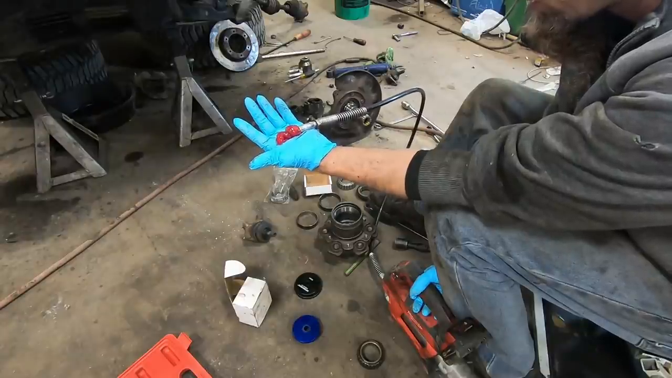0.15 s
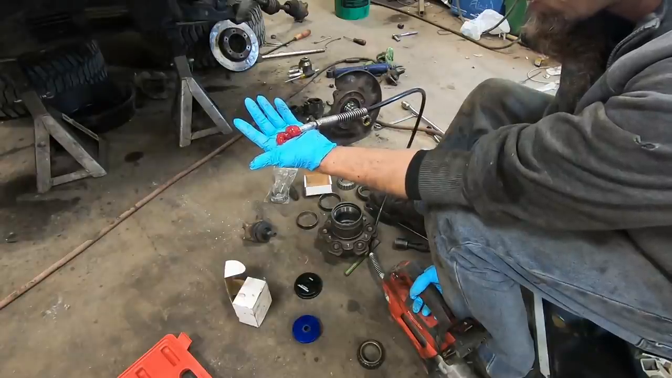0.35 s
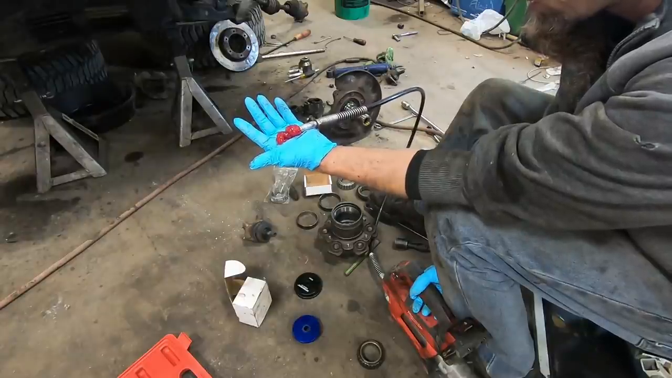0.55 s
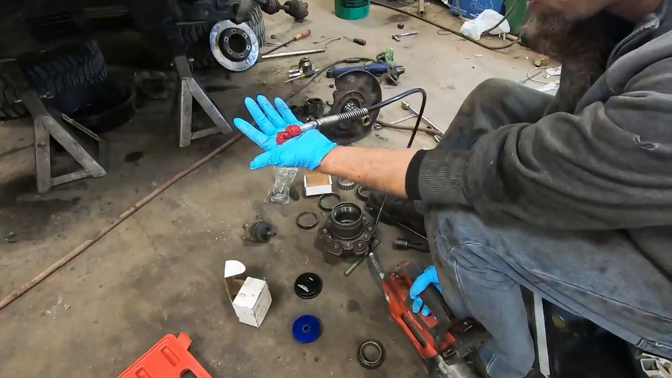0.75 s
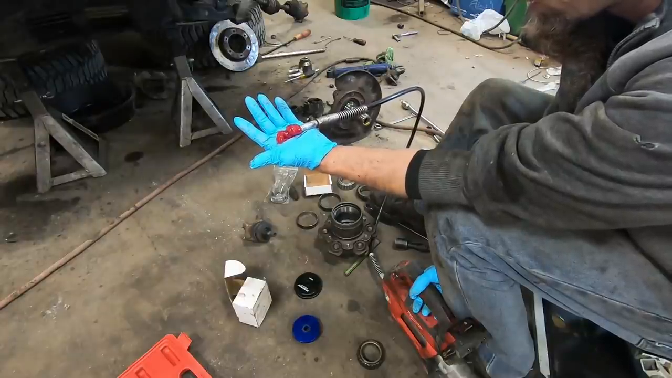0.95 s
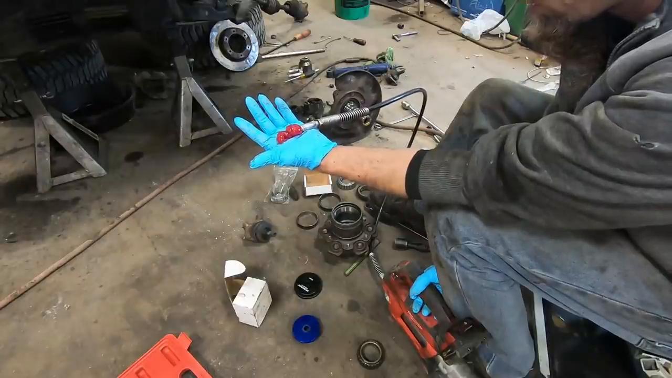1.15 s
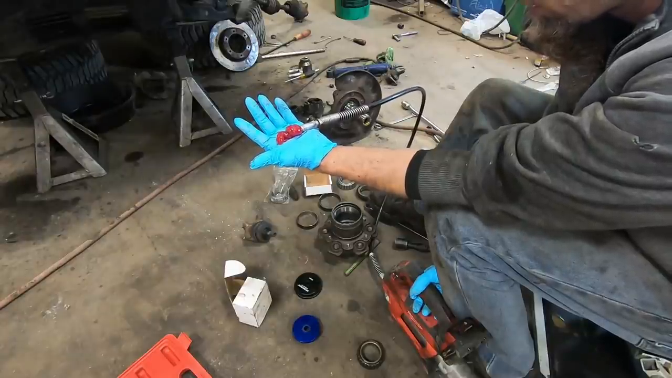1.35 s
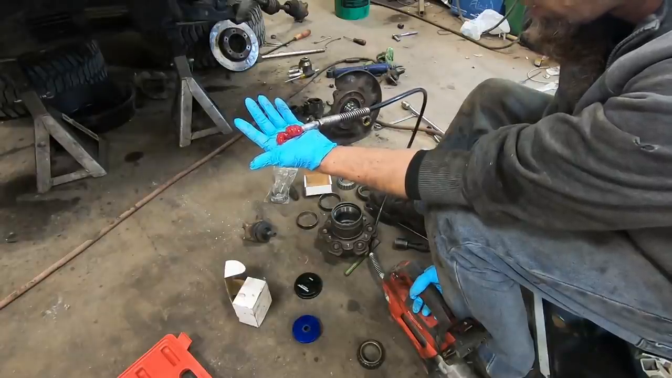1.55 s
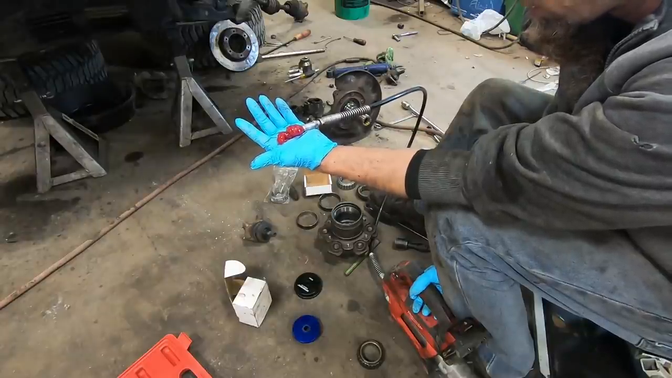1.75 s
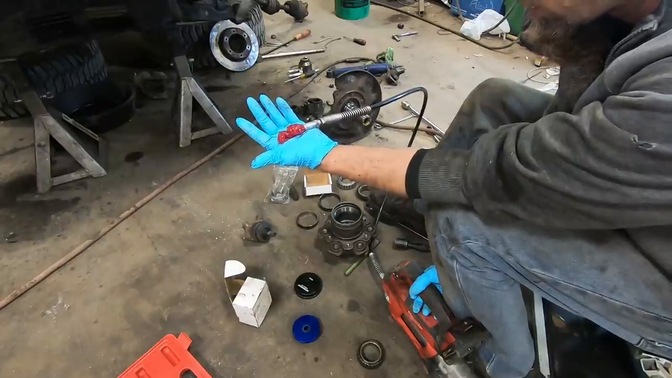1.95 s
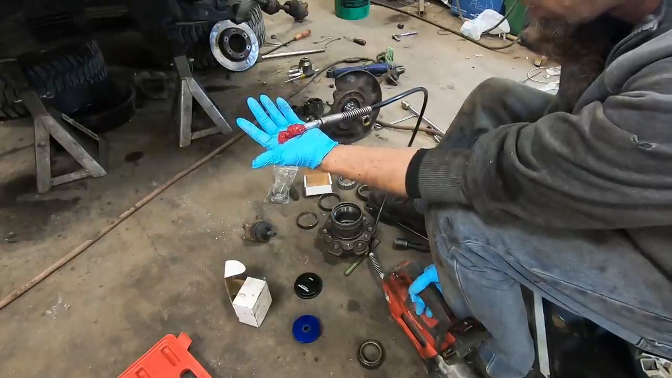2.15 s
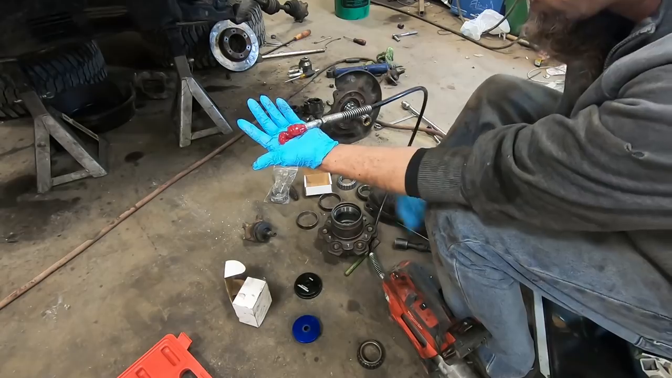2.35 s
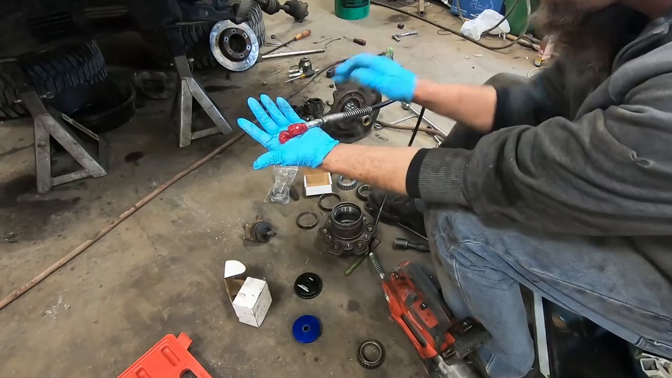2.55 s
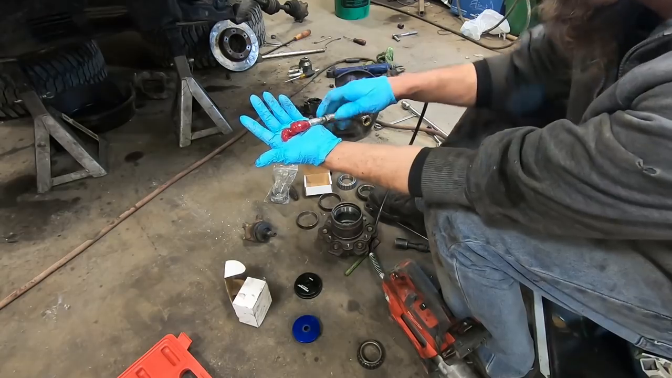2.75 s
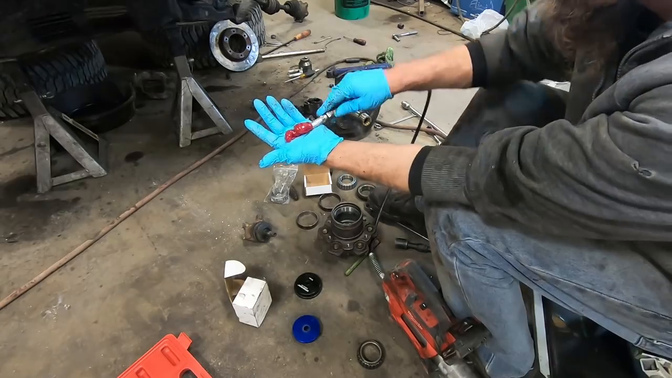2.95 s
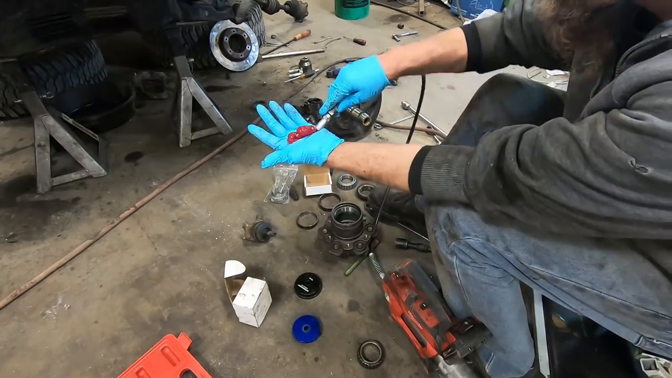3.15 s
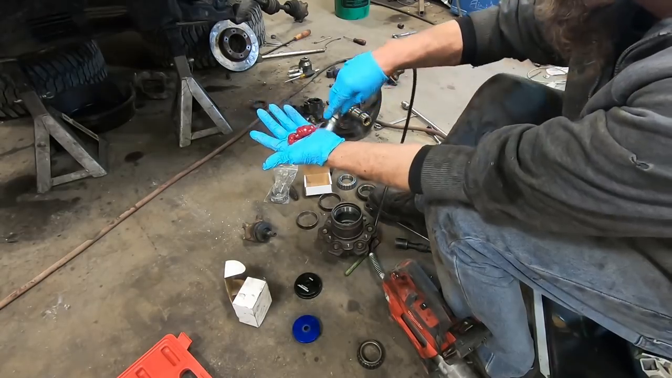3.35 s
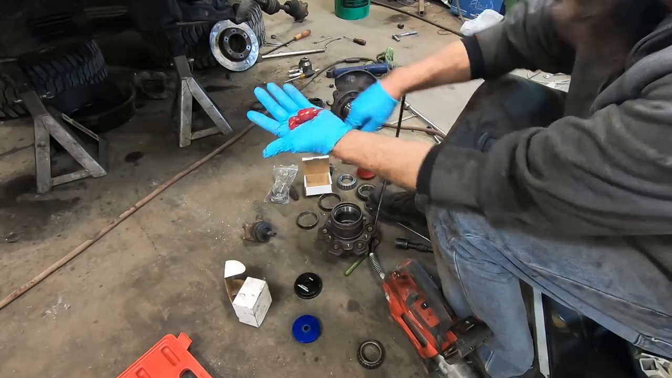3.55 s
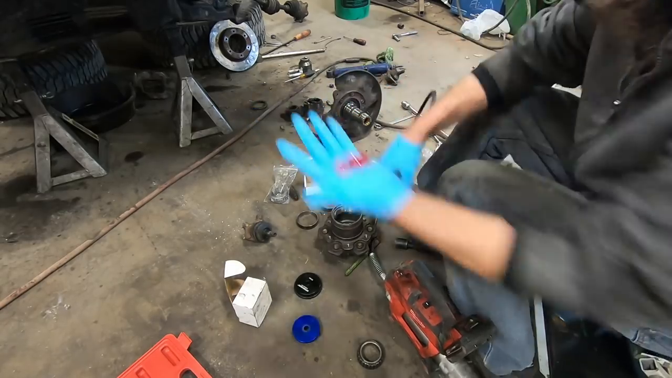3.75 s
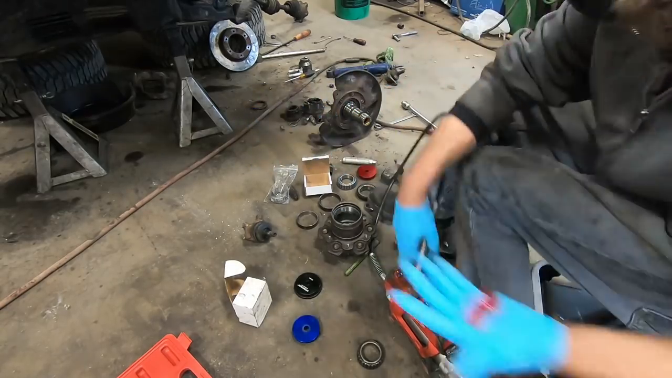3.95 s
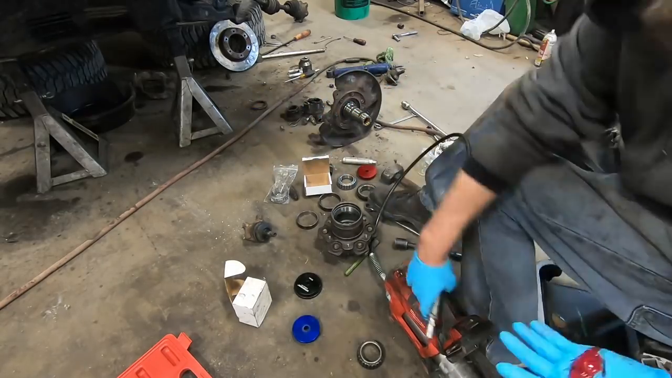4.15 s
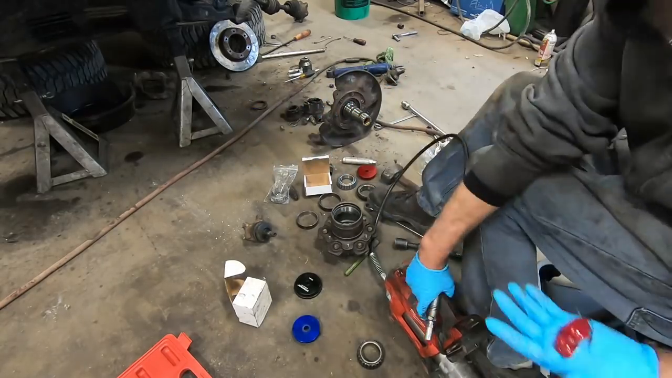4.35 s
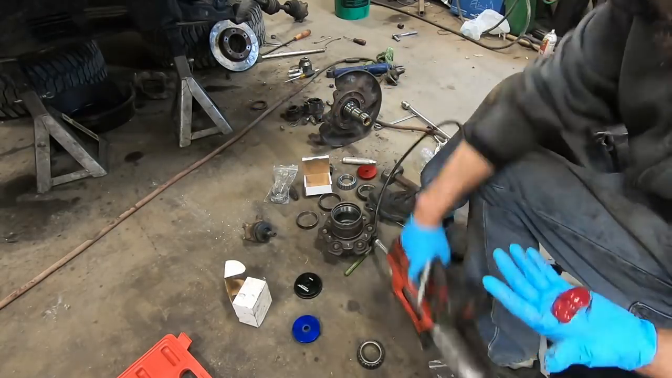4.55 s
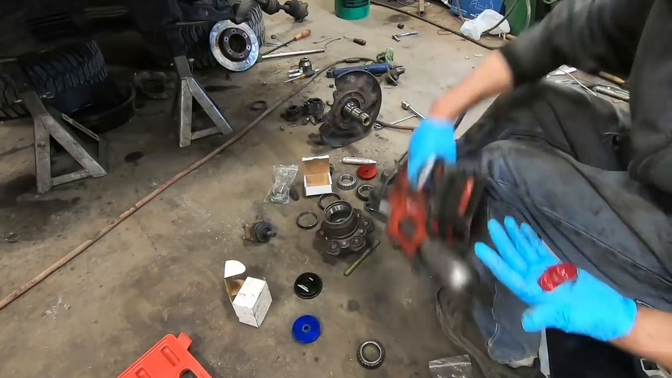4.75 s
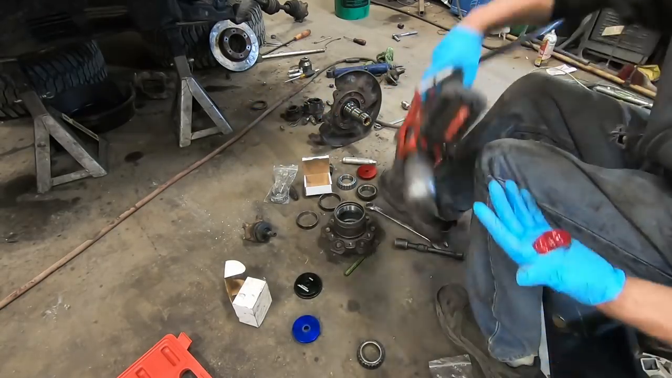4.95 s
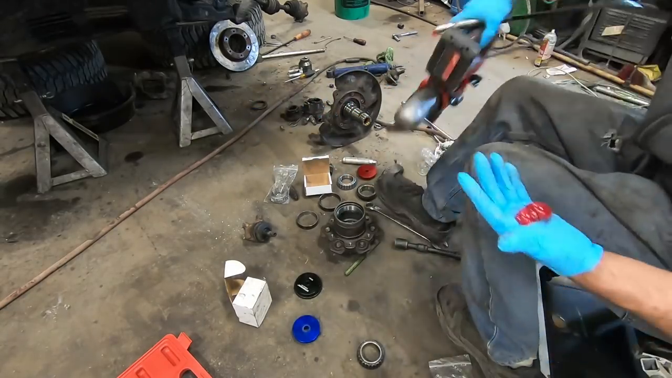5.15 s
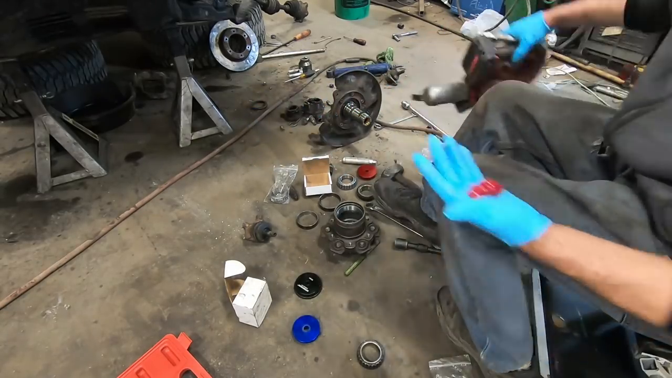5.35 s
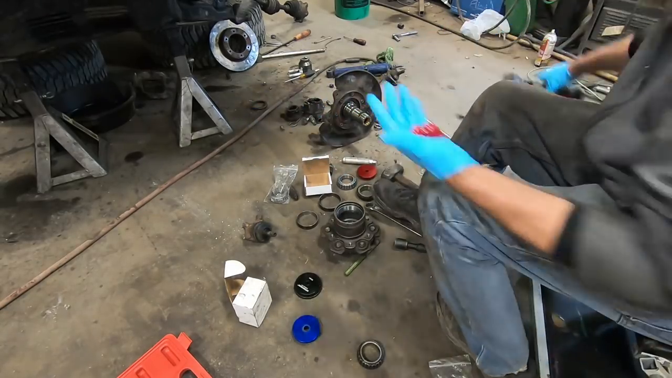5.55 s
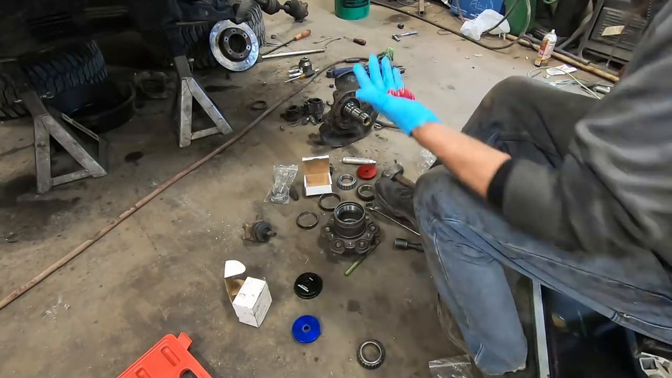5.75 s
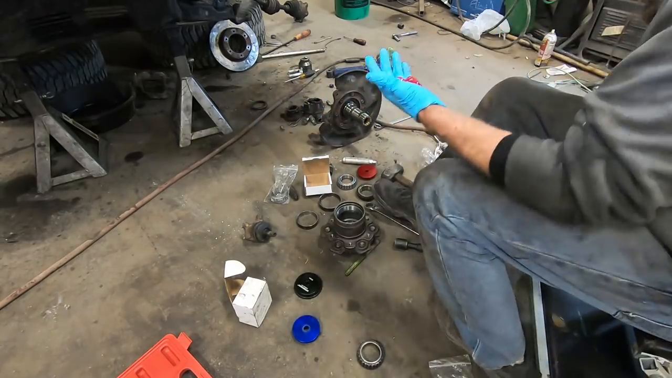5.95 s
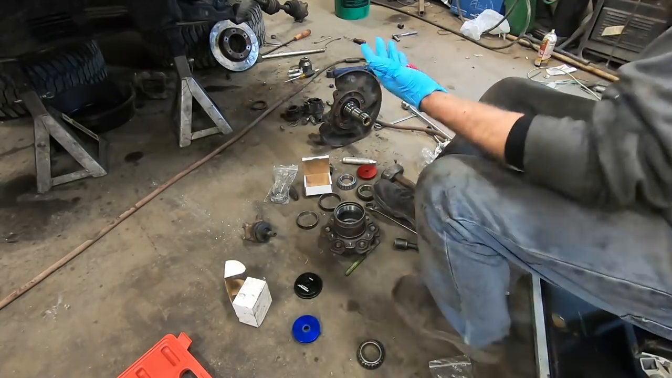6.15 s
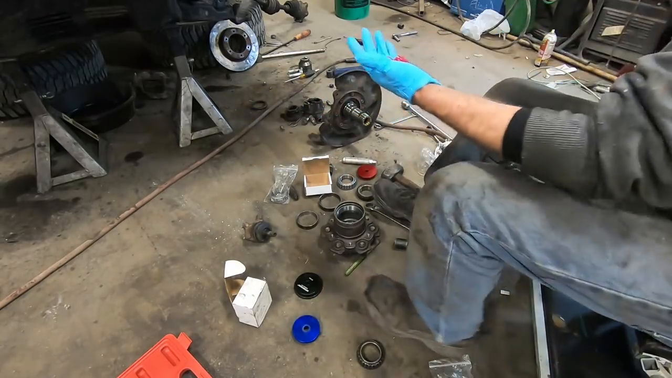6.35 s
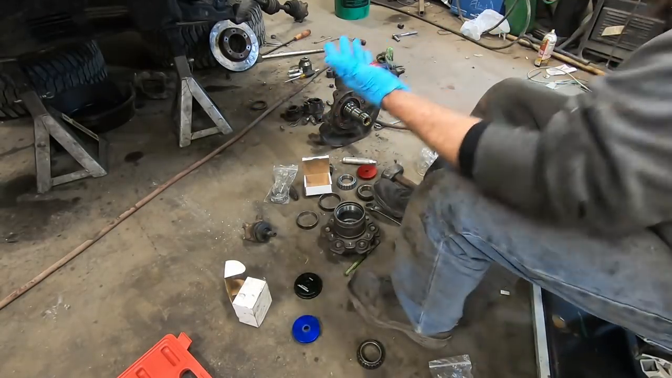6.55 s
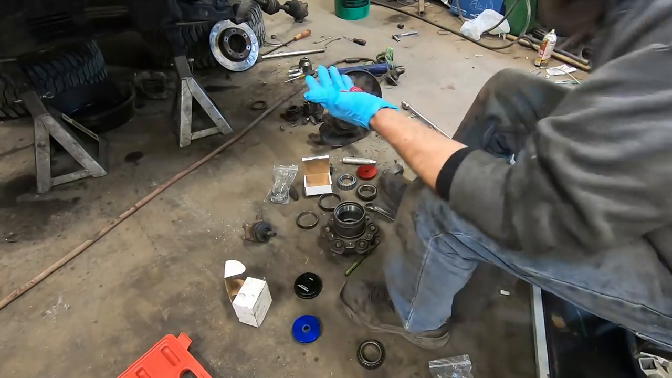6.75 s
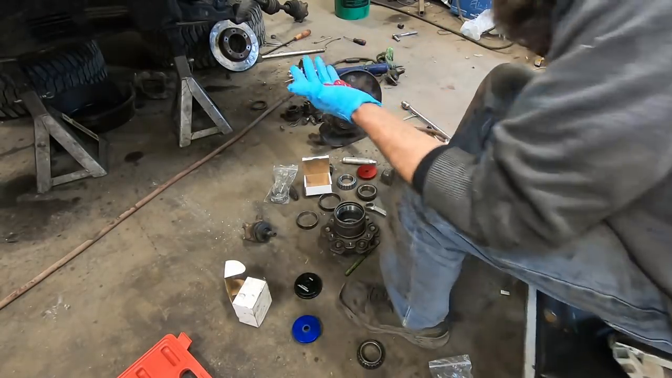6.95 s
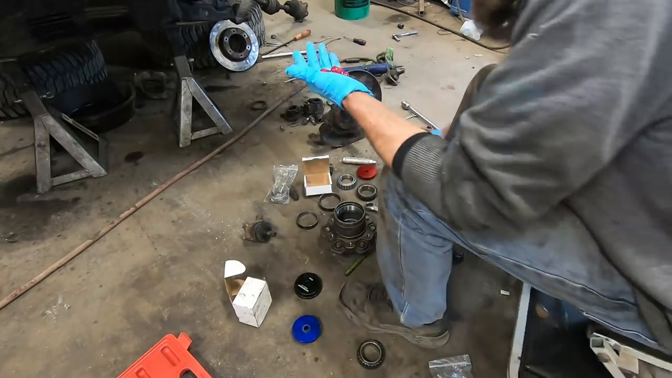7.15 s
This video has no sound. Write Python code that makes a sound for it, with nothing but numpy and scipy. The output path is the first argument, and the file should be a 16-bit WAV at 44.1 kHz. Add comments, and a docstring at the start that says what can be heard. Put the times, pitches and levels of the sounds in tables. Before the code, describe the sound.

Five pulsing strokes of a geared motor pump, each ending in a sharp clack, then quiet ticks, a hollow tool thud, floor knocks and cloth rustle.

```python
"""A battery grease gun whines on a workshop floor, right of the stereo microphones; it slows under load
and its plunger clacks once a stroke. Gear noise, shaft tones and filtered bursts make it.
It stops; the hose is laid down, the gun lifted and set aside: decaying modes give thuds and metal rattle,
short noise bursts give ticks and bumps. Shaped noise makes clothes rustle. The hall rings for most
of a second, and a slow machine, three wavering sines, hums far off over soft air noise."""
import sys
import numpy as np
from scipy import signal
from scipy.fft import rfft, irfft
from scipy.io import wavfile
from scipy.ndimage import uniform_filter1d

SR = 44100
rng = np.random.default_rng(int(sys.argv[2]) if len(sys.argv) > 2 else 0)


def bounce(signal):
    """Save signal as a 16-bit WAV file at the path given by the first command-line argument."""
    frames = np.transpose(np.atleast_2d(signal))
    limited = np.clip(frames, -1, 1)
    pcm = np.round(limited * 32767).astype(np.int16)
    wavfile.write(sys.argv[1], SR, pcm)


N = 317079
T = np.arange(N) / SR  # seconds

# Plunger clacks. Each row: start in seconds, level in dB.
CLACKS = [(0.1778, -8.5), (0.627, -9), (1.0779, -11), (1.526, -9.5), (1.9742, -8)]
# Clack resonances. Each row: centre in Hz, width in Hz, gain in dB.
CLACK_RING = [(2540, 430, -6), (5200, 1220, -5), (8540, 2500, -4.5), (885, 220, -9.5)]
CLACK_RISE_S = .0008
STROKE_S, STOP_S, COAST_S = .449, 2.333, .018
# Nominal shaft speed over one stroke. Each row: seconds after the clack, speed in Hz.
SHAFT_SPEED = [(0, 325), (.05, 337.5), (.12, 343.5), (.2, 346), (.276, 347), (.325, 326), (.372, 310),
               (.4, 309), (.449, 323)]
# Shaft tones before dip, flutter and shell. Each row: multiple of shaft speed, dB running free, dB loaded.
SHAFT_TONES = [(1, -55, -50.5), (2, -53, -57), (4, -49, -55), (5, -47, -55), (9, -60, -47.5),
               (10, -57, -50), (11, -62, -52), (12, -46, -53)]
FLUTTER_FREE_DB, FLUTTER_LOADED_DB = 1.8, 3.5  # each scales a random walk
# Shell modes that lift a tone gliding through. Each row: centre in Hz, width in Hz, gain in dB.
SHELL = [(2800, 130, 6), (2970, 170, 6), (3090, 90, 3), (3420, 200, 10), (4150, 220, 4)]
# Gear rattle spectrum. Each row: frequency in Hz, density in dB per Hz.
RATTLE = [(59, -75), (100, -34), (330, -17.5), (513, -20), (688, -11.5), (748, -11.5), (1370, -5),
          (2000, -7.5), (3830, -8), (4080, -11), (4350, -7), (8500, -21.5), (12400, -25.5), (14100, -44),
          (15000, -79)]
# Gearbox shell under strain, filtered twice. Each row: centre in Hz, width in Hz, gain per pass in dB.
STRAIN = [(2890, 520, -0.5), (3500, 1200, 1)]
# Air slots, filtered twice. Each row: centre in Hz, width in Hz, gain per pass in dB.
HISS = [(6790, 1550, 6), (7810, 910, -6.5)]
# Housing knocked by loose teeth, filtered twice. Each row: centre in Hz, width in Hz, gain per pass in dB.
GROWL = [(1363, 140, 0.0065), (1426, 280, 0.0091)]
# noise levels before load and dip act on them
RATTLE_DB, STRAIN_DB, HISS_DB, GROWL_DB = -31, -39, -38, -40.5
# around each clack the gun's sound dips away, then swells back
DIP_LEAD_S, DIP_S, DIP_SHAPE = .003, 0.073, 1.68
# the plunger meets the grease late in the stroke: load rises 0-1 and holds to the clack
LOAD_S, BITE_S, LOAD_RISE_S = 0.2663, 0.016, 0.054
STRAIN_BITE_DB, STRAIN_FADE_DB_PER_S, HISS_BITE_DB = 9.5, 49, 5
RATTLE_LOADED_DB, GROWL_LOADED_DB = 0, -3.5
# Place of the gun. Each row: frequency in Hz, left minus right in dB.
GUN_PAN = [(60, -6), (110, 2), (200, -2.5), (370, -1.5), (690, -3), (1270, -8.5), (2330, -5.5),
           (4290, -5.5), (7890, -19.5), (14500, 3)]
# Width of the gun's noise. Each row: frequency in Hz, likeness of left and right from -1 to 1.
GUN_ALIKE = [(60, 0.51), (130, 0.25), (290, 1), (630, 0.67), (1380, 0.83), (3030, 0.69), (6630, 0.19),
             (14500, 0.38)]
# Hall decay. Each row: frequency in Hz, time to fall 60 dB in seconds.
HALL = [(125, 0.91), (250, 0.71), (500, 0.72), (1000, 1), (2000, 1.0), (4000, 0.87), (8000, 0.51),
        (14000, 0.25)]
# Hall colour. Each row: frequency in Hz, gain in dB.
HALL_TILT_DB = [(100, -1.5), (500, 2.5), (2000, 1), (6000, -3), (14000, -6)]
GUN_WET_DB, THUD_WET_DB, KNOCK_WET_DB, METAL_WET_DB = -10, -6.5, -4.5, -15  # sends to the hall
# the hum is weaker while the gun runs and creeps back after
HUM_HZ, HUM_DB, HUM_DUCK_DB, HUM_BACK_S = 23.7, -46, 4, 0.42
HUM_WAVER_DB = .25  # scales a random walk
HUM_SECOND_DB, HUM_THIRD_DB = -13, -30  # harmonics relative to the first, before wavering
# Still air of the hall. Each row: frequency in Hz, density in dB per Hz.
AIR = [(18, -33), (30, -24), (41, -12.5), (49, -21), (73, -43), (125, -40.5), (154, -38.5), (566, -49.5),
       (1110, -43.5), (1330, -38.5), (1870, -44.5), (2760, -39.5), (4650, -45), (6520, -38), (15000, -69.5)]
AIR_DB, AIR_LOW_HZ = -59.5, 36  # level before it wavers, low cut
# Width of air and cloth. Each row: frequency in Hz, likeness of left and right from -1 to 1.
AIR_ALIKE = [(60, 0.58), (130, 0.89), (290, 0.21), (630, -0.25), (1380, 0.22), (3030, 0.82), (6630, 0.024),
             (14500, -0.32)]
# Clothes and boots moving. Each row: time in seconds, level in dB before the tilt.
RUSTLE = [(3.3, -76), (3.6, -72), (3.76, -56.5), (4.25, -58), (4.4, -56), (4.66, -56), (4.8, -61),
          (5.0, -61), (5.45, -70), (6.0, -64), (6.21, -50.5), (6.45, -64.5), (6.9, -56.5), (7.07, -48.5),
          (7.19, -57)]
# Cloth spectrum before the tilt. Each row: frequency in Hz, density in dB per Hz.
RUSTLE_COLOUR = [(71, -47), (120, -14), (141, -10.5), (179, 9), (412, -11), (735, 9.5), (1140, -6.5),
                 (1360, -3), (4410, -21), (6570, -14), (14000, -41.5)]
RUSTLE_TILT_DB = 8  # treble up, bass down
RUSTLE_SWAY_DB = 2  # scales a random walk
# A low shuffle near 95 Hz. Each row: time in seconds, level in dB.
SHUFFLE = [(7.03, -72), (7.09, -51), (7.19, -44)]
# Ticks and knocks. Each row: start in seconds, level in dB before treble shaping, centre in Hz,
# width in octaves, time to fall 60 dB in seconds.
KNOCKS = [(3.51, -49, 7000, 1.1, .03), (3.752, -47.5, 2200, 0.74, 0.097), (3.839, -41.5, 1810, 1.06, 0.022),
          (4.283, -39.5, 7500, 1.25, 0.2), (4.331, -28.5, 1240, 0.7, 0.029), (4.553, -41, 6800, .9, .015),
          (4.698, -48, 6000, 1, 0.035), (4.855, -44.5, 7040, 0.76, 0.077), (4.985, -36, 700, 0.47, 0.096),
          (5.012, -35, 7050, 1.1, 0.063), (5.094, -43, 7500, 0.41, 0.046), (6.042, -32, 1440, 1.15, .08),
          (6.054, -29, 1190, 1.3, 0.12), (6.078, -28, 2230, 1.7, 0.1), (6.092, -31, 1840, 1, 0.15),
          (6.590, -39.5, 4000, 1.5, 0.083), (6.602, -30, 4370, 2.6, 0.063), (6.617, -45, 3950, 2.3, 0.031),
          (6.815, -39, 4030, .9, .008), (6.829, -36.5, 5000, 0.95, .012), (6.848, -40, 6000, 0.8, .01),
          (6.916, -32.5, 1920, 0.76, .03), (6.946, -26.5, 4000, 0.78, 0.027),
          (6.962, -30.5, 1860, 1.34, 0.1)]
# Treble of ticks and clacks. Each row: frequency in Hz, gain in dB.
TICK_TOP_DB = [(5500, 0), (7000, 5), (8300, -1), (9500, -14), (12500, -12), (15000, -38)]
BLUNT_T60_S, BLUNT_RISE_S = 0.076, 0.0034  # a burst this long rises this slowly; rise goes as length squared
# Dull bumps of boots and floor. Each row: start in seconds, level in dB, centre in Hz, width in octaves,
# time to fall 60 dB in seconds.
BUMPS = [(4.331, -44, 203, 0.56, 0.085), (4.621, -50.5, 404, 0.45, 0.14), (4.68, -46.5, 287, 0.29, 0.085),
         (4.741, -46, 253, .5, .095), (4.83, -45.5, 252, .4, .1), (4.885, -43, 278, 0.35, 0.11),
         (6.044, -30.5, 152, 0.91, 0.093), (6.078, -13.5, 202, 1, 0.036), (6.1, -24.5, 201, 0.45, 0.11),
         (6.134, -38, 220, 0.42, 0.042), (6.199, -27.5, 218, 0.27, .06), (6.612, -40, 303, 1, 0.054),
         (6.944, -37, 260, 1, 0.11), (7.06, -38, 140, 1, 0.095)]
# Thuds of the gun body. Each row: start in seconds, peak in dB before bass cut and pan.
THUDS = [(5.002, -8.5), (5.008, -4), (5.04, -13.5), (5.092, -16)]
# Gun body modes. Each row: frequency in Hz, level in dB before scatter, time to fall 60 dB in seconds.
BODY = [(192, -8, 0.096), (251.3, 3.5, 0.14), (310, 2.5, 0.038), (414, -3.5, 0.081), (534, -6.5, 0.038),
        (741, -0.5, 0.085), (908, -8.5, 0.048), (1010, -15.5, 0.037), (1233, -13, 0.079),
        (1430, -14, 0.059), (1640, -18, 0.041)]
THUD_CONTACT_MS, BODY_LOW_HZ = 0.27, 165
# Hose coupler ticking. Each row: start in seconds, peak in dB before pan.
COUPLER = [(4.3975, -46), (4.4476, -52)]
# Coupler modes. Each row: frequency in Hz, level in dB before scatter, time to fall 60 dB in seconds.
COUPLER_RING = [(6860, 4, 0.096), (9760, -13, .04), (10600, -7, 0.033), (11700, -12, 0.039)]
# Jolts that shake loose metal parts. Each row: start in seconds, peak in dB before pan.
JOLTS = [(4.6294, -54), (4.6984, -42), (4.8474, -50), (5.0034, -35.5), (5.0214, -35), (5.0928, -35)]
# Loose metal modes. Each row: frequency in Hz, level in dB before scatter, time to fall 60 dB in seconds.
METAL = [(3610, -1, .08), (3650, -8, .06), (4955, -12, .07), (6445, -3, .07), (7720, -3, .06),
         (8220, 0, .07), (8420, -2, .06), (9510, -22, .04), (10500, -21, .03), (11530, -17, .04),
         (12470, -21, .04)]
BOUNCE_S, BOUNCE_DROP_DB = .022, 6  # mean spacing, drop per bounce
BODY_SCATTER_DB, METAL_SCATTER_DB = 2, 4
DETUNE = .003  # spread of a mode's pitch from blow to blow, as a share
THUD_PAN_DB, KNOCK_PAN_DB, BUMP_PAN_DB, METAL_PAN_DB = -5, -9.5, -3.5, -11  # left minus right
TOP_HZ = 14800


def undb(db):
    """Decibels to amplitude."""
    return 10 ** (np.asarray(db) / 20)


def level(x, db):
    """Set the RMS level of a sound."""
    return x * undb(db) / np.sqrt(np.mean(x ** 2))


def along(table, n):
    """A (Hz, value) table read at the bins of an n-point spectrum."""
    hz, value = np.transpose(table)
    return np.interp(np.log(np.arange(n // 2 + 1) * SR / n + 1), np.log(hz), value)


def shape(x, gain):
    """Filter by a gain for each bin."""
    return irfft(rfft(x) * gain, x.shape[-1])


def humps(table, n):
    """Gain of (Hz, width, dB) resonances side by side."""
    f = np.arange(n // 2 + 1) * SR / n + 1
    return sum(undb(db) / (1 + 1j * (f / hz - hz / f) * hz / width) for hz, width, db in table)


def walk(rate):
    """Random values held 1 / rate s and smoothed twice; spread near 0.7."""
    k = int(SR / rate)
    held = np.repeat(rng.standard_normal(N // k + 1), k)
    return 0.96 * uniform_filter1d(uniform_filter1d(held, k), k)[:N]


def pair(a, b, alike):
    """Left and right from two unrelated sounds, as alike as the table says."""
    likeness = np.clip(along(alike, N), -.99, .99)
    mid = shape(a, np.sqrt((1 + likeness) / 2))
    side = shape(b, np.sqrt((1 - likeness) / 2))
    return np.array([mid + side, mid - side])


def add(out, s, y, db, pan_db):
    """Mix a short sound in at time s, panned by left minus right in dB."""
    i = int(s * SR)
    y = y[..., :N - i]
    out[:, i:i + y.shape[-1]] += y * undb(db + np.array([[pan_db], [-pan_db]]) / 2)


def ring(modes, rise_s, scatter_db):
    """One blow on a body: its modes decay, each struck a little differently; peak 1."""
    hz, db, t60 = np.transpose(modes)[:, :, None]
    t = T[:SR // 2]
    chance = rng.standard_normal((len(modes), 2))
    strength = undb(db + scatter_db * chance[:, :1])
    tones = np.sin(2 * np.pi * hz * (1 + DETUNE * chance[:, 1:]) * t)
    decay = np.exp(-np.log(1000) * t / t60)
    y = (strength * tones * decay).sum(axis=0) * np.minimum(t / rise_s, 1)
    return y / np.abs(y).max()


def bursts(table, apart, pan_db):
    """Short noise bursts, each with its own colour and decay; longer ones start more softly."""
    out, t = np.zeros((2, N)), T[:16384]
    octave = np.log2(np.arange(8193) * SR / 16384 + 1)
    for s, db, hz, width, t60 in table:
        t60 = max(t60, .005)
        rise = BLUNT_RISE_S * (t60 / BLUNT_T60_S) ** 2
        decay = np.exp(-np.log(1000) * np.maximum(t - rise, 0) / t60)
        swell = np.minimum((t + 1 / SR) / rise, 1) * decay
        noise = rng.standard_normal((2, 16384)) * swell
        colour = np.exp(-.5 * ((octave - np.log2(hz)) / width) ** 2)
        # shaped after the envelope, shifted to keep the filter's lead-in
        y = np.roll(shape(noise[0] + apart * noise, colour), 256, axis=1)
        # size set by energy, so one lucky sample does not decide it
        size = np.sqrt((swell ** 2).sum() / (y ** 2).sum(axis=1).mean()) / 2
        add(out, s - 256 / SR, y * size, db, pan_db)
    return out


def clack():
    """A sharp noise burst with a weaker tail rings the clack resonances; energy fixed."""
    t = T[:2048]
    snap = t / CLACK_RISE_S * np.exp(1 - t / CLACK_RISE_S)
    burst = rng.standard_normal((2, 2048)) * (snap + 0.086 * np.exp(-t / 0.0065))
    colour = humps(CLACK_RING, 2048) * undb(along(TICK_TOP_DB, 2048))
    burst = shape(burst[0] + .5 * burst, colour)
    return burst / np.sqrt((burst ** 2).sum() / 40)


def gun():
    """Turning gears modulate rattle, growl, strain and hiss; shaft tones glide; each stroke clacks."""
    starts = np.r_[CLACKS[0][0] - STROKE_S, np.transpose(CLACKS)[0]]
    since = T - starts[np.searchsorted(starts, T) - 1]
    fallen_s = (since + DIP_LEAD_S) % STROKE_S
    dip_db = 20 * np.log10(1 - np.exp(-(fallen_s / DIP_S) ** DIP_SHAPE) + 0.0022)
    loaded_s = np.maximum(since - LOAD_S, 0)
    bite = np.minimum(loaded_s / BITE_S, 1)
    load = np.minimum(loaded_s / LOAD_RISE_S, 1)
    rattle_db = dip_db + RATTLE_LOADED_DB * load
    strain_db = 2.0 * dip_db + STRAIN_BITE_DB * bite - STRAIN_FADE_DB_PER_S * loaded_s
    hiss_db = 0.53 * dip_db + HISS_BITE_DB * bite
    growl_db = 1.7 * dip_db + GROWL_LOADED_DB * load

    running = np.exp(-np.maximum(T - STOP_S, 0) / COAST_S)
    hz = np.interp(since, *np.transpose(SHAFT_SPEED))
    jitter = 1 + (0.00078 + 0.0027 * load) * walk(60.293)
    turns = np.cumsum(hz * running ** .25 * jitter) / SR
    # planet gears pass once in five and six shaft turns and throb the noise
    sixth = np.sin(2 * np.pi * turns / 6)
    throb = 1 + 0.047 * sixth + 0.059 * np.sin(2 * np.pi * turns / 5) + 0.28 * np.sin(2 * np.pi * turns)
    grit = throb * undb(0.93 * walk(150) + 1.0 * walk(23.66))

    def teeth():
        """Four noises, each shaped by its own part of the gun."""
        noise = rng.standard_normal((4, N)) * grit
        loose = noise[3] * undb(2.6 * walk(250))
        growl = level(shape(loose, humps(GROWL, N) ** 2), GROWL_DB)
        rattle = level(shape(noise[0], undb(along(RATTLE, N))), RATTLE_DB)
        strain = level(shape(noise[1], humps(STRAIN, N) ** 2), STRAIN_DB)
        hiss = level(shape(noise[2], humps(HISS, N) ** 2), HISS_DB)
        return undb(growl_db) * growl + undb(rattle_db) * rattle + undb(strain_db) * strain + undb(hiss_db) * hiss

    flutter_db = FLUTTER_FREE_DB + (FLUTTER_LOADED_DB - FLUTTER_FREE_DB) * load
    tones = np.zeros(N)
    for k, free_db, loaded_db in SHAFT_TONES:
        tone_db = free_db + (loaded_db - free_db) * load + 0.62 * dip_db + flutter_db * walk(45.06)
        tones += np.sqrt(2) * undb(tone_db) * np.sin(2 * np.pi * (k * turns + rng.random()))
    tones = shape(tones, 1 + np.abs(humps(SHELL, N)))

    out = running * (pair(teeth(), teeth(), GUN_ALIKE) + tones * (1 + 0.19 * sixth))
    for s, db in CLACKS:
        add(out, s - .001, clack(), db, 0)
    pan_db = along(GUN_PAN, N)
    return shape(out, undb(np.array([pan_db, -pan_db]) / 2))


def hall(x):
    """Diffuse noise tail, each octave decaying at its own pace, partly alike left and right."""
    n = SR
    octave = np.log2(np.arange(n // 2 + 1) * SR / n + 1)
    tail = np.zeros((2, n))
    for hz, t60 in HALL:
        band = shape(rng.standard_normal((2, n)), np.exp(-(octave - np.log2(hz)) ** 2 / .5))
        tail += band * np.exp(-np.log(1000) * T[:n] / t60) / np.sqrt(t60)
    tail = shape(tail * np.minimum(T[:n] / 0.0031, 1), undb(along(HALL_TILT_DB, n)))
    tail[1] = 0.85 * tail[0] + 0.77 * tail[1]
    tail /= np.sqrt((tail ** 2).sum(axis=1).mean())  # mean energy 1
    return signal.fftconvolve(x, tail, axes=1)[:, :N]


def background():
    """The far machine's hum, three wavering harmonics, over the still air of the hall."""
    turn = 2 * np.pi * np.cumsum(HUM_HZ + 0.12 * walk(1.944)) / SR
    duck_db = HUM_DUCK_DB * np.exp(-np.maximum(T - STOP_S, 0) / HUM_BACK_S)
    second = undb(HUM_SECOND_DB + 0.78 * walk(8)) * np.sin(2 * turn)
    third = undb(HUM_THIRD_DB + 6.2 * walk(7.1)) * np.sin(3 * turn)
    hum = undb(HUM_DB - duck_db + HUM_WAVER_DB * walk(5)) * (np.sin(turn) + second + third)
    air = shape(pair(*rng.standard_normal((2, N)), AIR_ALIKE), undb(along(AIR, N)))
    air = signal.sosfilt(signal.butter(4, AIR_LOW_HZ, "high", fs=SR, output="sos"), air)
    return np.sqrt(2) * hum + level(air, AIR_DB) * undb(1.9 * walk(3.67))


def rustle():
    """Grainy cloth noise as the body moves, and a low shuffle of resonant noise."""
    s, db = np.transpose(RUSTLE)
    grain = undb(1.2 * walk(200) + RUSTLE_SWAY_DB * walk(22))
    grains = pair(*(rng.standard_normal((2, N)) * grain), AIR_ALIKE)
    cloth = level(shape(grains, undb(along(RUSTLE_COLOUR, N))), 0)
    low = shape(cloth, along([(900, 1), (4000, 0)], N))
    tilt = undb(RUSTLE_TILT_DB)
    tilted = low / tilt + (cloth - low) * tilt
    shuffle = level(shape(rng.standard_normal(N), humps([(96.6, 64, 0)], N) ** 2), 0)
    shuffle_db = np.interp(T, *np.transpose(SHUFFLE), left=-99)
    return undb(np.interp(T, s, db, left=-99)) * tilted + shuffle * undb(shuffle_db)


def knocks():
    """Ticks and knocks as short coloured noise bursts, dulled at the very top."""
    return shape(bursts(KNOCKS, 0.22, KNOCK_PAN_DB), undb(along(TICK_TOP_DB, N)))


def thuds():
    """Boots and floor bump; blows ring the low modes of the gun body."""
    out = np.zeros((2, N))
    push = np.hanning(int(THUD_CONTACT_MS * SR / 1000) + 2)  # brief contact softens the blow
    for s, db in THUDS:
        y = np.convolve(ring(BODY, 0.00069, BODY_SCATTER_DB), push)
        add(out, s, y / np.abs(y).max(), db, THUD_PAN_DB)
    # the light body radiates no deep bass
    out = signal.sosfilt(signal.butter(6, BODY_LOW_HZ, "high", fs=SR, output="sos"), out)
    return out + bursts(BUMPS, 0.15, BUMP_PAN_DB)


def jingles():
    """The coupler ticks; loose metal rings at each jolt and bounces twice more, weaker each time."""
    out = np.zeros((2, N))
    for s, db in COUPLER:
        add(out, s, ring(COUPLER_RING, .002, 2.42), db, METAL_PAN_DB)
    for s, db in JOLTS:
        for k in range(3):
            delay = k * BOUNCE_S * (1 + .1 * rng.standard_normal())
            part = ring(METAL, 0.003, METAL_SCATTER_DB)
            add(out, s + delay, part, db - k * BOUNCE_DROP_DB, METAL_PAN_DB)
    return out


def scene():
    """Close sounds go direct and, summed to mono, into the hall; cloth and background stay dry."""
    near = gun(), knocks(), thuds(), jingles()
    sends_db = GUN_WET_DB, KNOCK_WET_DB, THUD_WET_DB, METAL_WET_DB
    wet = sum(undb(db) * x for db, x in zip(sends_db, near))
    return sum(near) + hall(np.tile(wet.mean(axis=0), (2, 1))) + rustle() + background()


def record(dry):
    """The recorder rounds the loudest peaks and cuts the top."""
    rounded = .9 * np.tanh(dry / .9)
    return signal.sosfilt(signal.ellip(8, .2, 70, TOP_HZ, fs=SR, output="sos"), rounded)


dry = scene()
out = record(dry)
bounce(out)
```